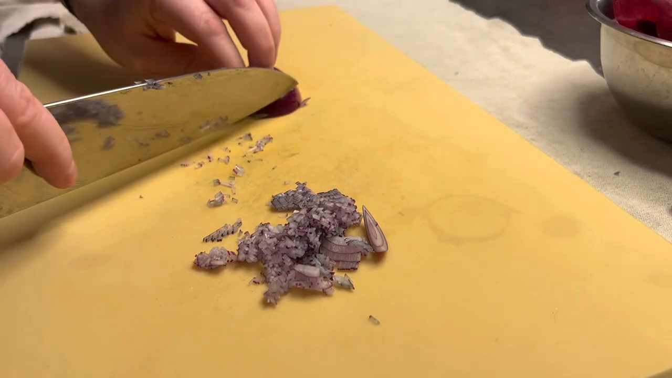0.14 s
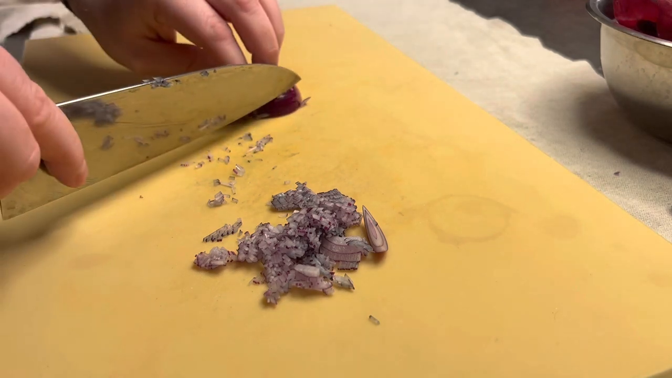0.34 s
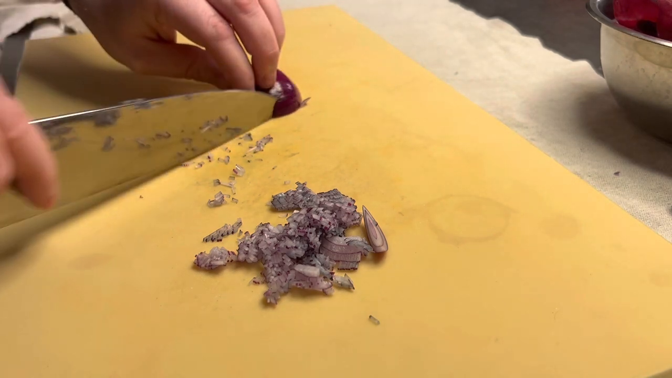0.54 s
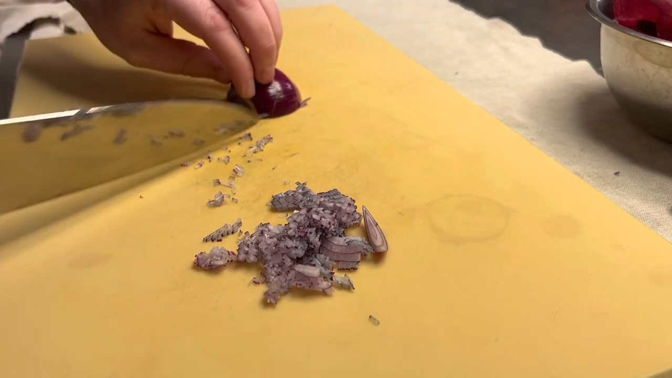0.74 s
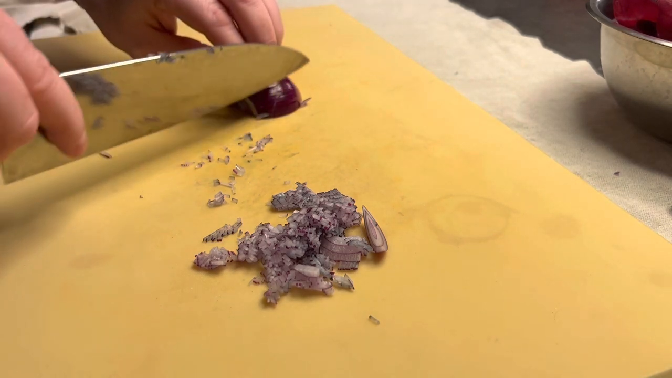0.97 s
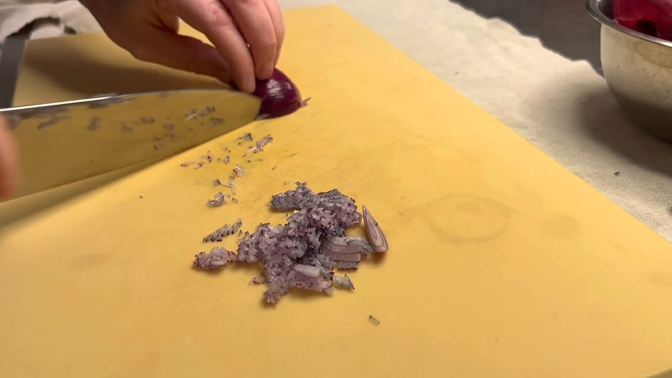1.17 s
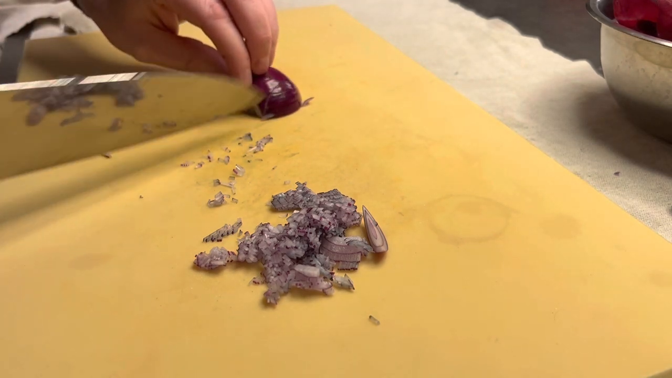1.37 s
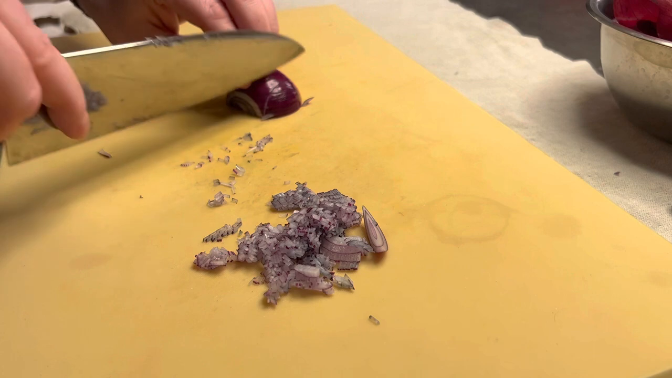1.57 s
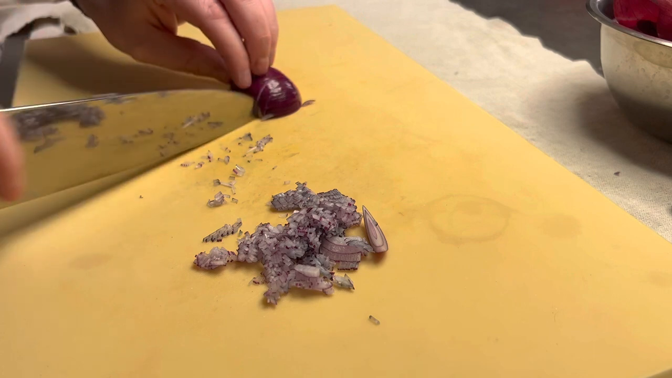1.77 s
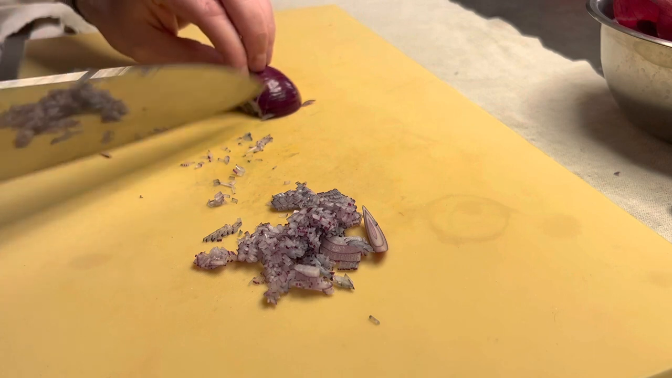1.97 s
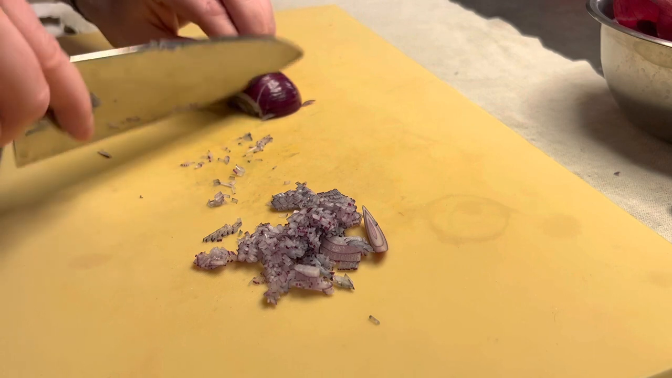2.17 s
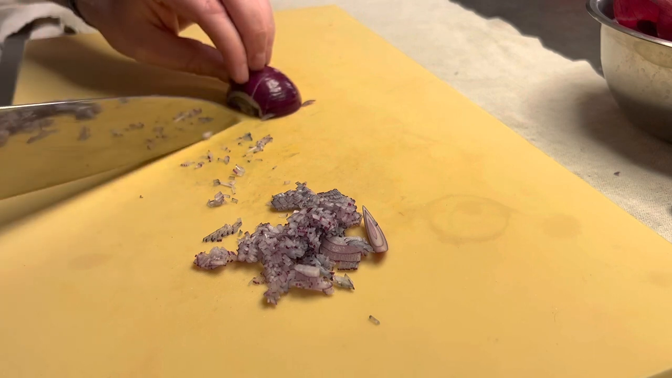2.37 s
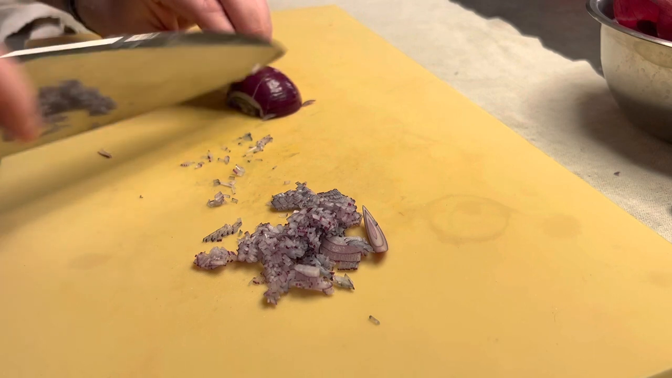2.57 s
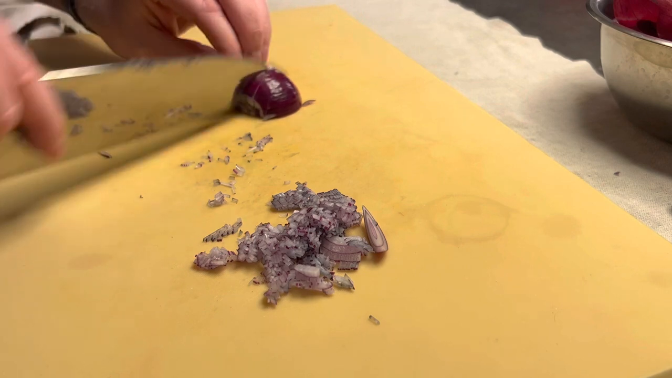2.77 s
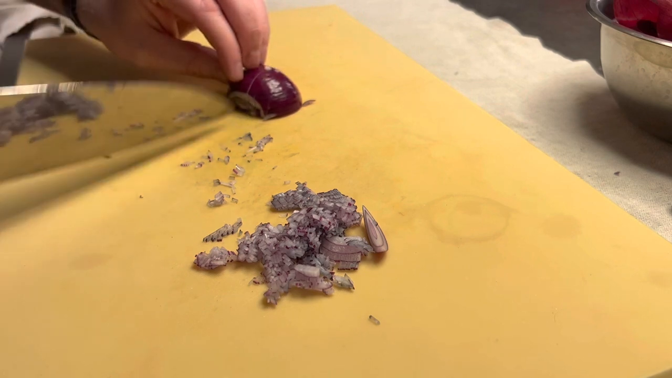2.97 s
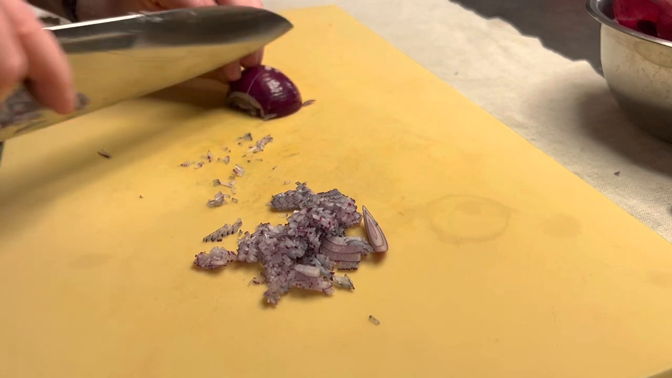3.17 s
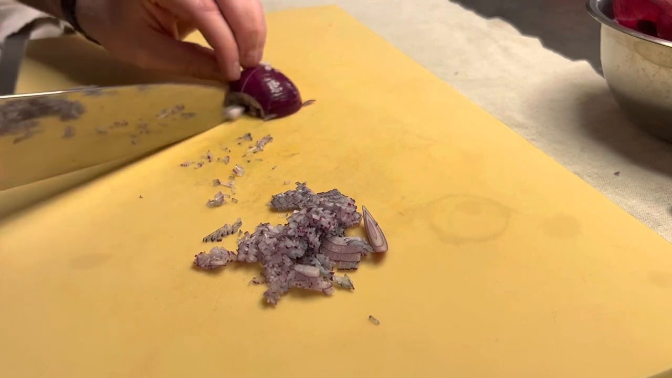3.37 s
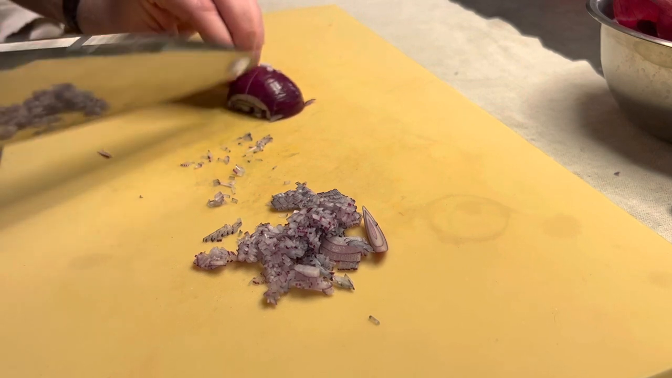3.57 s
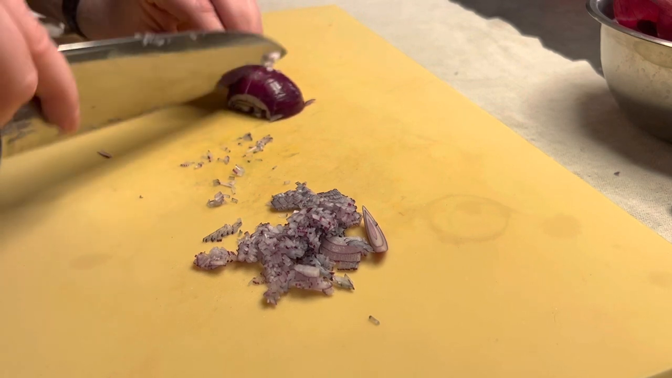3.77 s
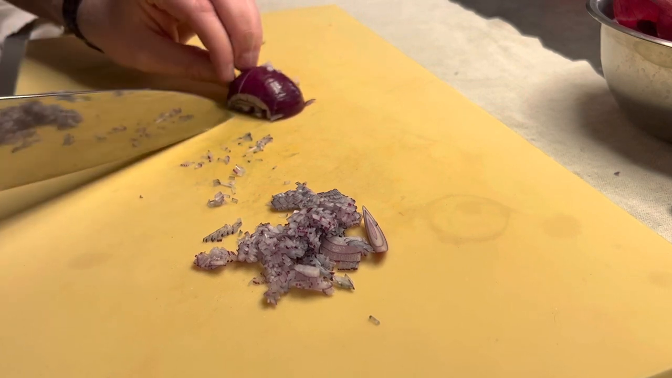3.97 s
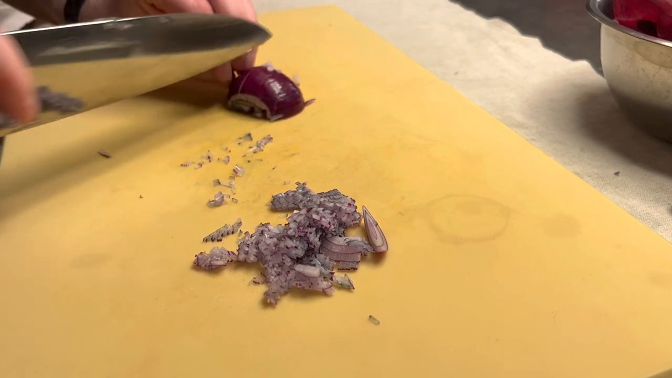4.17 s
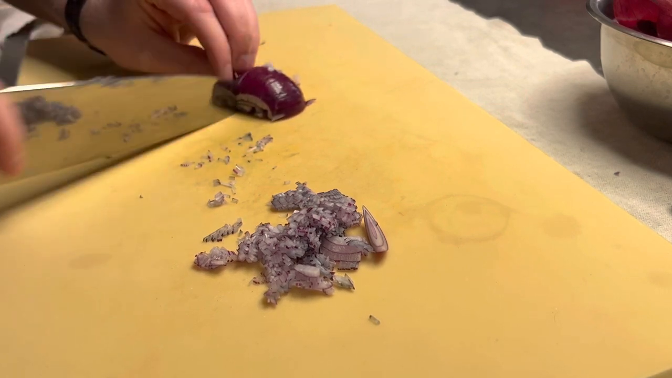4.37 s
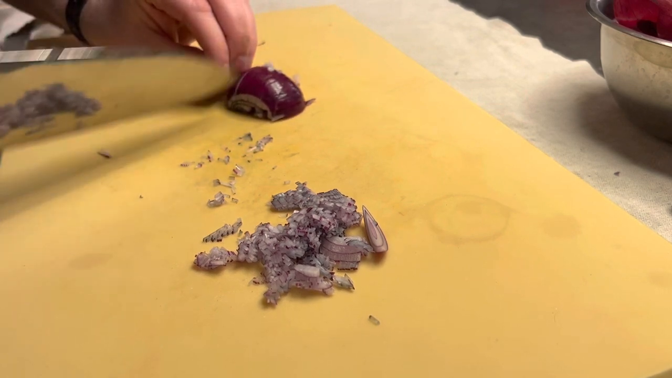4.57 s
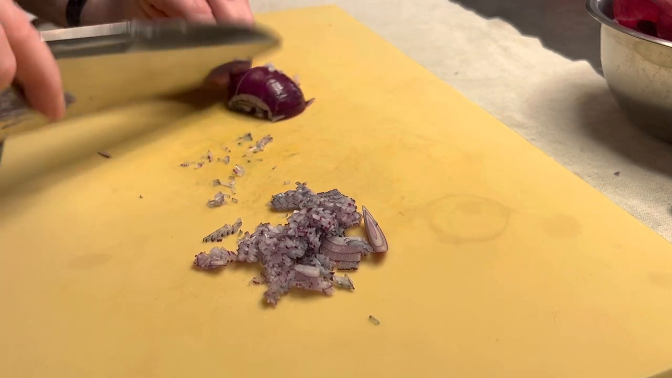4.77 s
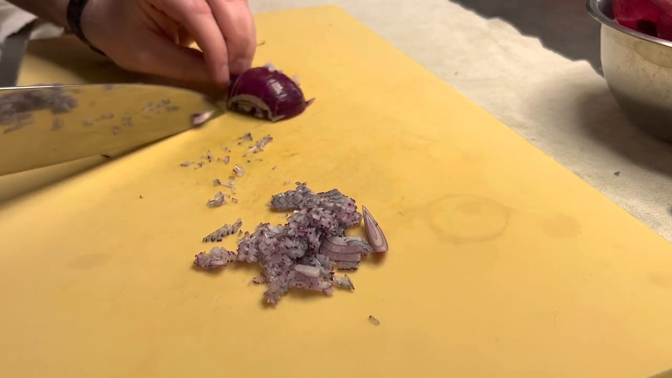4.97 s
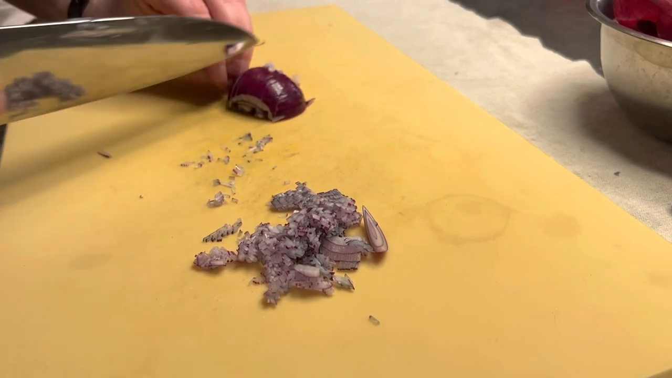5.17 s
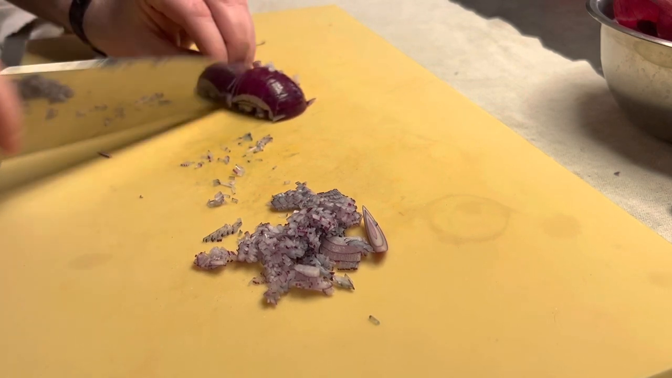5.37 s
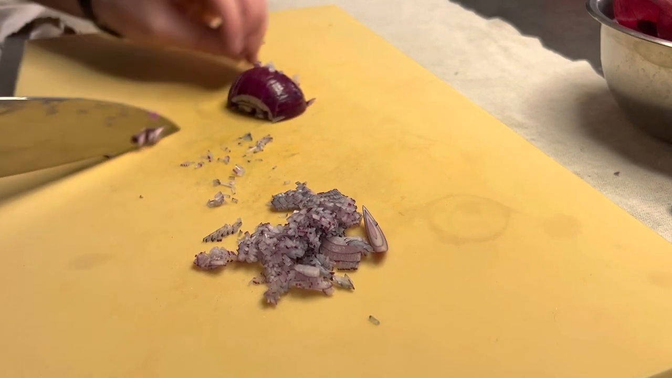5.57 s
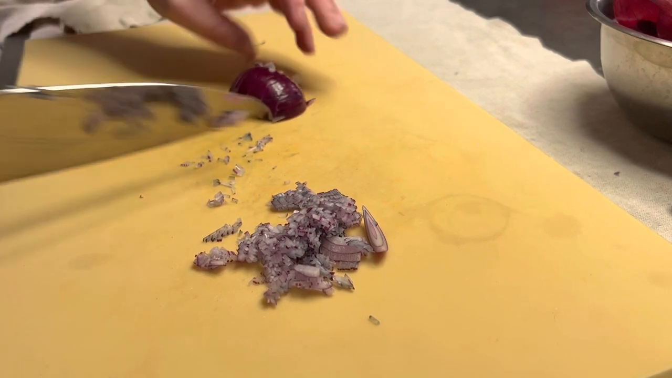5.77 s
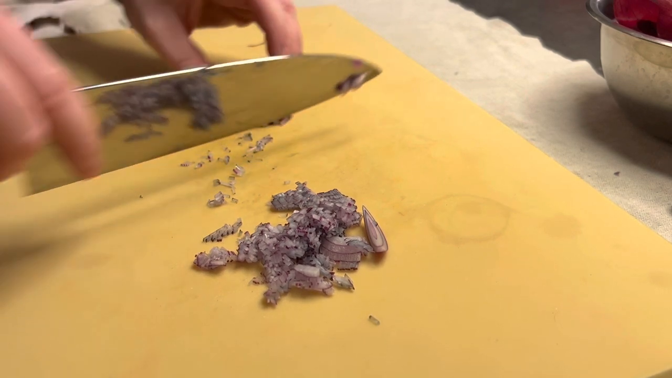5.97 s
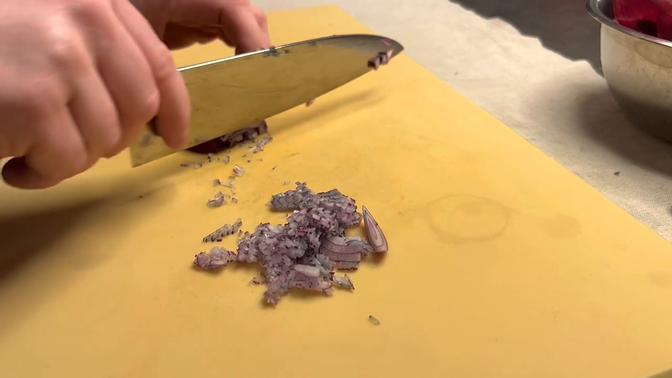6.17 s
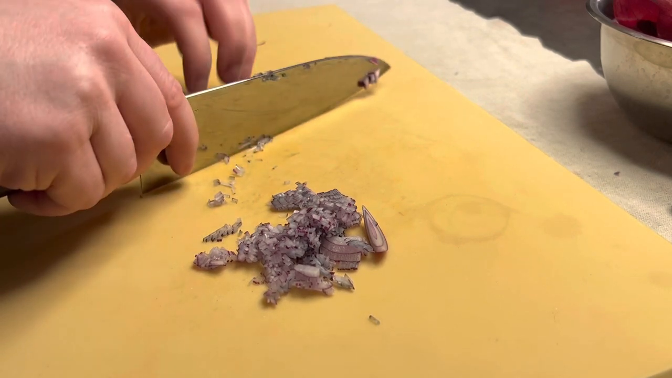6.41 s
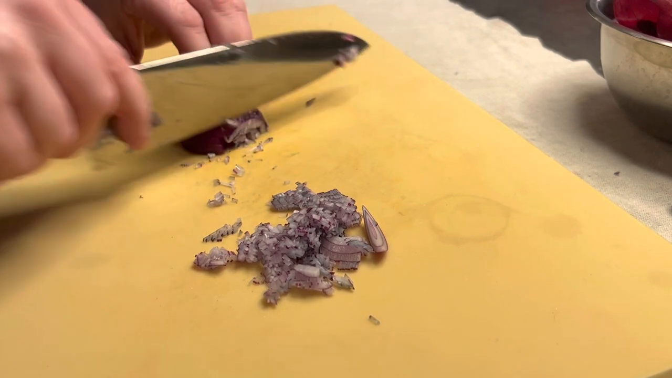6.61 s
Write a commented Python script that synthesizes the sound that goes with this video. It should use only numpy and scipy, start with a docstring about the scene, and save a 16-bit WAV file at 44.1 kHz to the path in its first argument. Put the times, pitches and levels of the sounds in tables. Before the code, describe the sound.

A knife crunches through a small crisp onion ten times, each slice ending in a dull knock on a plastic board, then one firmer final chop.

```python
"""Ten crunchy slices through a small onion and one last chop, each ending in a knock on a plastic board,
close to a phone in a quiet kitchen. Crunch is noise made of tiny clicks, filtered and made to flicker;
snaps are short bursts of such noise. Each knock is a short push into the same ringing modes of the board.
Fingers and blade rustle as softly wavering noise; the room answers briefly over a low appliance rumble."""
import sys
import numpy as np
from scipy import signal
from scipy.fft import rfft, irfft, next_fast_len
from scipy.io import wavfile
from scipy.ndimage import uniform_filter1d

SR = 44100
rng = np.random.default_rng(int(sys.argv[2]) if len(sys.argv) > 2 else 0)


def volts(x):
    """Linear amplitude factor 10**(x/20) for a level x in dB, scalar or array-like."""
    e = np.asarray(x, float) / 20
    return 10 ** e


def dump(signal):
    """Clip the signal to [-1, 1] and save it as 16-bit WAV at the path in sys.argv[1]."""
    limited = np.clip(np.atleast_2d(signal).T, -1, 1)
    pcm = np.round(limited * 32767).astype(np.int16)
    wavfile.write(sys.argv[1], SR, pcm)


N = 292824
T = np.arange(N) / SR  # time/s
SIZE = next_fast_len(N + SR)  # room for a second of ringing after the end
HZ = np.arange(SIZE // 2 + 1) * SR / SIZE

# blade meets board: start t/s, strength of the push/dB, contact time/ms,
# spot (0 for strokes with the tip, 1 for the chop nearer the edge)
BLOWS = [(0.512, -10.5, 0.938, 0), (1.126, -14.5, 1.259, 0), (1.7024, -11.5, 0.986, 0),
         (2.2672, -10.5, 1.023, 0), (2.8036, -9.5, 0.913, 0), (3.3274, -9, 0.9, 0), (3.86, -10.5, 0.957, 0),
         (4.3625, -9.5, 1.037, 0), (4.8849, -10.5, 1.093, 0), (5.3951, -10, 0.931, 0),
         (6.3031, -8, 1.185, 1)]
# blade through the onion, each row ending at the blow of the same row: skin bitten t/s, bite level/dB,
# layers entered t/s, fizz level on entry/dB, fizz level at the board/dB
STROKES = [(0.455, -66, 0.462, -50, -43.5), (1.0385, -44.5, 1.042, -49.5, -50.5),
           (1.6083, -46.5, 1.6216, -54.5, -44.5), (2.1672, -44, 2.1804, -49, -48.5),
           (2.696, -43, 2.742, -48, -47), (3.2254, -40.5, 3.255, -54.5, -45.5),
           (3.7606, -44, 3.77, -49.5, -43), (4.275, -41.5, 4.2916, -52, -44),
           (4.786, -40.5, 4.795, -52, -46), (5.302, -45, 5.297, -53.5, -46)]
# colour of the crunching onion: f/Hz, level per Hz/dB
CRUNCH_COLOUR = [(900, -4.5), (1700, -8), (3500, -4), (5500, -7.5), (8000, -8), (10000, -17.5), (12500, -4),
                 (15300, -8), (16300, -28)]


def along(table):
    """Read an (f/Hz, value) table at every frequency, in straight lines on a log axis."""
    hz, value = np.transpose(table)
    return np.interp(np.log(HZ + 1), np.log(hz + 1), value)


def shape(x, gain):
    """Filter by a gain per frequency."""
    return irfft(rfft(x, SIZE) * gain, SIZE)[..., :N]


def unit(x):
    """Scale to rms 1."""
    return x / np.sqrt(np.mean(x ** 2))


def causal(db):
    """Minimum-phase gain for a dB response, so that a click starts sharply."""
    cepstrum = irfft(db * np.log(10) / 20, SIZE)
    cepstrum[1:SIZE // 2] *= 2
    cepstrum[SIZE // 2 + 1:] = 0
    return np.exp(rfft(cepstrum))


def walk(rate):
    """A random level that wanders smoothly, with `rate` new values a second and a spread near 1."""
    hold = int(SR / rate)
    steps = np.repeat(rng.standard_normal(N // hold + 1), hold)
    smooth = uniform_filter1d(uniform_filter1d(steps, hold), hold)
    return 0.82 * smooth[:N]


def grains(spread_db):
    """Dense tiny clicks, mostly small and a few large."""
    size_db = spread_db * rng.exponential(size=N)
    return unit(rng.standard_normal(N) * volts(size_db))


def band(hz, octaves):
    """Gain of a smooth band around hz."""
    return np.exp(-(np.log2((HZ + 1) / hz) / octaves) ** 2)


def octave(hz):
    """Gain of a band that overlaps its neighbours an octave away."""
    return band(hz, 0.821)


def kitchen():
    """Appliance rumble and faint hiss: noise bands flicker alone and swell together."""
    # colour of the background: f/Hz, relative level/dB
    rumble = [(30, -6), (45, 0), (116, 0), (244, -9), (396, -15), (700, -30), (1000, -35), (1500, -36),
              (2100, -47), (7500, -52), (10000, -70), (13000, -50), (16000, -64)]
    rms_db = -53.5
    colour = volts(along(rumble))
    swell = walk(0.891)
    out = 0
    for hz in 30 * 2. ** np.arange(10):
        mid, side = shape(rng.standard_normal((2, N)), colour * octave(hz))
        flicker = volts(.7 * swell + 1.2 * walk(9))
        width = min(hz / 920.0, .9)  # the bass is nearly alike left and right
        out = out + flicker * (mid + width * side * np.array([[1], [-1]]))
    return volts(rms_db) * unit(out)


def room(x, build_s):
    """Diffuse echo of decaying noise, each band with its own decay; the bass is alike at both ports."""
    # echo bands: f/Hz, time to fall by 60 dB/s, level before the build-up/dB
    echo_bands = [(59, 0.37, -18.5), (116, 0.42, -9.5), (270, 0.43, -10.5), (449, 0.5807, -15),
                  (1000, 0.4044, -13), (1850, 0.5556, -8.5), (4000, 0.41, -10.5), (8000, 0.33, -13),
                  (13000, .25, -50)]
    u, echo = T[:SR], 0
    for hz, t60, db in echo_bands:
        noise = rfft(rng.standard_normal((2, SR)), SIZE)
        mid, side = irfft(noise * octave(hz), SIZE)[:, :SR]
        width = min(hz / 800., 1)
        decay = np.exp(-np.log(1000) * u / t60)
        tail = (mid + width * side * np.array([[1], [-1]])) * decay
        # small high waves come back at once from the worktop, long low ones build up slowly
        rise = 1 - np.exp(-(u / build_s * (hz / 500) ** .5) ** 2)
        # the root evens out the energy of long and short decays
        echo = echo + volts(db) * tail * rise / np.sqrt(t60 * SR / 14)
    return shape(x, rfft(echo, SIZE))


def ports(x):
    """The phone's two sound ports sit apart: level and phase differ with frequency."""
    # how far the left port leads: f/Hz, phase/radians
    phase = [(900, 0), (2000, .6), (3500, 2.1), (5000, 1), (7000, 0), (10000, -3.1), (13300, -6.3),
             (16600, -9.4)]
    # left minus right: f/Hz, level/dB
    balance = [(400, 4), (1300, 6.5), (2400, 8.5), (4400, 7.5), (8000, 6), (15000, -2.5)]
    half = volts(along(balance) / 2)
    left = half * np.exp(1j * along(phase))
    return shape(x, np.array([left, 1 / half]))


def rustle():
    """Fingers and blade slide on onion and board: fine wavering grains that swell and fade."""
    # moves: loudest t/s, level of the treble from 11 to 16 kHz/dB, swell over 20 dB/s, fade over 20 dB/s
    slides = [(1.15, -72, 0.018, 0.13), (1.3, -76, .04, 0.02), (1.59, -78.5, .45, 0.8),
              (1.74, -72, .03, 0.87), (3.35, -71, .02, 0.2163), (2.14, -91, .1, 0.2),
              (3.89, -73, .02, 0.35), (4.25, -77.5, .45, 0.46), (5.43, -73, .03, .3),
              (5.91, -75, 0.056, 0.43), (6.05, -71.5, 0.235, 0.28), (6.21, -77.5, 0.063, 0.36),
              (6.34, -73, .03, 0.63), (6.47, -80, .2, 0.92), (6.53, -70, 0.033, 0.06)]
    # colour of sliding: f/Hz, level per Hz/dB
    slide_colour = [(500, -14), (1500, -9), (3000, -9), (5500, -7), (8000, -9), (12500, 0), (15500, -2),
                    (17000, -20)]
    slide = shape(grains(spread_db=1.5), volts(along(slide_colour))) * volts(2. * walk(50))
    treble = shape(slide, (HZ > 11000) & (HZ < 16000))
    slide /= np.sqrt(np.mean(treble ** 2))
    power = 0
    for s, db, swell_s, fade_s in slides:
        below_peak = 20 * np.maximum((s - T) / swell_s, (T - s) / fade_s)
        power = power + volts(db - below_peak) ** 2
    return slide * np.sqrt(power)


def snaps():
    """Each snap is one sharp crack and a dying burst of grains, wide but strongest near its own pitch."""
    # layers snapping, crumbs ticking: start t/s, peak level/dB, time to fall by 60 dB/s, strongest f/Hz
    cracks = [(0.3861, -61.5, 0.008, 13500), (0.4715, -35, 0.0083, 12000), (1.0392, -38, 0.015, 3000),
              (1.296, -62, 0.026, 13500), (2.6124, -60.5, 0.0136, 12000), (2.7063, -41.5, 0.014, 4000),
              (2.739, -38, 0.029, 14500), (2.76, -38.5, 0.015, 3500), (3.2067, -57.5, 0.0056, 13500),
              (3.233, -40.5, 0.015, 4000), (3.2683, -37, 0.049, 13000), (3.3227, -34.5, 0.026, 7500),
              (3.4388, -55, 0.008, 5000), (4.3538, -32.5, 0.022, 8000), (4.7715, -57, 0.012, 14000),
              (4.8492, -39, 0.012, 3500), (5.5747, -56.5, 0.03, 2800), (5.901, -57, 0.01, 12070),
              (6.2113, -59, 0.008, 13000), (6.3007, -43, 0.022, 13500), (6.303, -42, 0.0255, 2600),
              (6.3105, -38.5, 0.04, 8610), (6.5276, -52.5, 0.00542, 13500), (6.542, -52.5, 0.02, 13500)]
    # the skin cracks at every bite, with its peak this far above the bite level
    skin_crack_db, skin_t60_s, skin_hz = 12, .014, 13500
    rows = [(s, db + skin_crack_db, skin_t60_s, skin_hz) for s, db, *_ in STROKES] + cracks

    out, size = np.zeros(N), 2048
    hz = np.arange(size // 2 + 1) * SR / size
    colour = rfft(irfft(causal(along(CRUNCH_COLOUR)), SIZE)[:size])
    noise = rng.standard_normal((len(rows), size))
    for (s, db, t60, peak_hz), grain in zip(rows, noise):
        burst = .45 * grain * np.exp(-np.log(1000) * T[:size] / max(t60, .002))
        burst[0] = 1  # the crack itself
        # one resonance over a flat share
        tint = volts(-12) + 1 / (1 + 2.5j * (hz / peak_hz - peak_hz / (hz + 1)))
        snap = irfft(rfft(burst) * tint * colour, size)
        out[int(s * SR):][:size] += volts(db) * snap / np.abs(snap).max()
    return out


def crackle(centres, flicker_db, rate):
    """Grains in narrow bands that flare and sink each on its own, as fibres of many sizes give way."""
    colour, noise = volts(along(CRUNCH_COLOUR)), grains(spread_db=3.)
    total = 0
    for hz in centres:
        total = total + shape(noise, colour * band(hz, 0.27)) * volts(flicker_db * walk(rate))
    return unit(total)


def pressure():
    """Loudness of fizz and crunch: the bite dies away, then the crunch gains on the fizz with depth."""
    bite_t60_s = 0.0877  # time for the bite to fall by 60 dB
    enter_s, stop_s = 0.0052, .004  # the layers take hold; the board stops the blade (fall to 1/e)
    # crunch compared with fizz: on entering the layers, growth down to the board, in the bite
    crunch_db, growth_db, bite_crunch_db = -7.5, 3.5, -13
    bite, fizz, crunch = np.zeros((3, N))
    for (skin_s, bite_db, layers_s, enter_db, last_db), (board_s, *_) in zip(STROKES, BLOWS):
        layers_s = max(layers_s, skin_s)
        depth = np.clip((T - layers_s) / (board_s - layers_s), 0, 1)
        grip = np.clip((T - layers_s) / enter_s, 0, 1)
        stop = np.exp(-np.clip(T - board_s, 0, None) / stop_s)
        cut = grip * stop * volts(enter_db + (last_db - enter_db) * depth)
        bite += (T >= skin_s) * volts(bite_db - 60 * np.clip(T - skin_s, 0, None) / bite_t60_s)
        fizz += cut
        crunch += cut * volts(crunch_db + growth_db * depth)
    return np.hypot(bite, fizz), np.hypot(bite * volts(bite_crunch_db), crunch)


def blade():
    """Cells burst in a bright fizz, layers part in a duller crunch, the pressure shakes the board a little."""
    # colour of the low push on the board: f/Hz, level per Hz/dB
    push_colour = [(100, -12.5), (200, 2), (450, -2.5), (750, -4), (1100, -22), (2000, -27)]
    push_db = 1.5  # push compared with crunch
    fizz = crackle(9000 * 2 ** np.arange(0, 1, .4), flicker_db=2., rate=500.)
    crunch = crackle(1000 * 2 ** np.arange(0, 3.1, .4), flicker_db=4., rate=250.)
    push = unit(shape(rng.standard_normal(N), volts(along(push_colour)))) * volts(3. * walk(120))
    fizz_gain, crunch_gain = pressure()
    # the blade sticks and slips from layer to layer: 2.2 dB of wavering, 70 new levels a second
    tear = volts(2.2 * walk(70))
    bright = fizz * fizz_gain * np.sqrt(tear)
    dull = (crunch + volts(push_db) * push) * crunch_gain * tear
    return bright + dull


def knocks():
    """Every blow is a short smooth push into the same modes; where it lands sets how far each swings."""
    # board and worktop modes: f/Hz, time to fall by 60 dB/s, then the signed swing (no unit)
    # for spot 0 left, spot 0 right, spot 1 left, spot 1 right
    modes = [(68, 0.45, -0.06, -0.06, -0.08, -0.09), (104, 0.016, 0.47, 0.51, 0.48, 0.48),
             (129, 0.162, -0.19, -0.22, -0.2, -0.22), (161, 0.205, -0.05, -0.06, -0.08, -0.1),
             (181, 0.45, -0.05, -0.04, -0.07, -0.05), (217, 0.105, 0.24, 0.36, 0.27, 0.42),
             (240, 0.125, 0.01, -0.18, 0.07, -0.14), (263, 0.179, 0.04, -0.03, 0.06, -0.02),
             (294, 0.137, -0.19, -0.06, -0.18, -0.03), (339, 0.073, -0.22, -0.35, -0.36, -0.53),
             (373, 0.189, 0.04, 0.16, 0.03, 0.2), (391, 0.22, -0.11, -0.11, -0.15, -0.17),
             (423, 0.45, 0.01, -0.03, 0.01, -0.04), (477, 0.068, 0.32, 0.36, 0.53, 0.6),
             (507, 0.139, 0.1, 0.11, 0.12, 0.06), (557, 0.119, -0.06, -0.11, -0.2, -0.19),
             (578, 0.045, 0.04, 0.08, 0.12, 0.63), (662, 0.066, 0.32, 0.14, 0.1, 0.59),
             (658, 0.027, 0.34, 0.02, 1.32, -0.9), (761, 0.019, 0.27, -0.27, -1.55, -0.12),
             (819, 0.063, -0.49, 0.16, 0.04, -0.07), (883, 0.023, -0.68, -0.75, -0.05, -0.43),
             (962, 0.236, 0.04, 0.04, -0.04, 0.01), (1019, 0.038, -0.59, -0.19, -0.27, -0.13),
             (1105, 0.197, -0.03, 0.01, -0.0, 0.04), (1176, 0.053, -0.2, 0.08, 0.09, 0.01),
             (1265, 0.018, 0.26, 0.53, 0.34, 0.24), (1303, 0.05, 0.08, -0.1, -0.06, -0.07),
             (1443, 0.012, 0.53, 0.21, 0.07, 0.21)]
    bending_lag = .0178  # low bending waves travel slowly: a mode at f Hz starts lag / sqrt(f) s late
    force = np.zeros((2, 1, N))
    for s, db, ms, spot in BLOWS:
        u = np.clip((T - s) / (ms / 1000), 0, 1)
        # dividing by the contact time lets longer pushes be weaker but equal in sum
        force[spot] += volts(db) * np.sin(np.pi * u) ** 2 * 2000 / (ms * SR)
    hz, t60, *swing = np.array(modes).T
    u = np.clip(T[:SR // 2] - bending_lag / np.sqrt(hz[:, None]), 0, None)
    ring = np.sin(2 * np.pi * hz[:, None] * u) * np.exp(-np.log(1000) * u / t60[:, None])
    response = np.reshape(np.array(swing) @ ring, (2, 2, -1))  # spot, side, time
    return shape(force, rfft(response, SIZE)).sum(0)


def scene():
    """Knocks and cutting, heard directly and through the room, over the kitchen."""
    board = knocks()
    edge = blade() + snaps() + rustle()
    echo = room(board.mean(0) + edge, build_s=.026)
    return board + ports(edge) + echo + kitchen()


def band_limit(x):
    """A steep low-pass at the top of the band."""
    return signal.sosfilt(signal.butter(12, 16850, fs=SR, output="sos"), x)


def record(dry):
    """The phone cuts the deepest bass and the top of the treble with steep filters."""
    low_cut = signal.butter(8, 39, "high", fs=SR, output="sos")  # Hz
    top_cut = signal.butter(12, 16500, fs=SR, output="sos")  # Hz
    mix = signal.sosfilt(np.vstack([low_cut, top_cut]), dry)
    return band_limit(mix)


dry = scene()
out = record(dry)
dump(out)
```